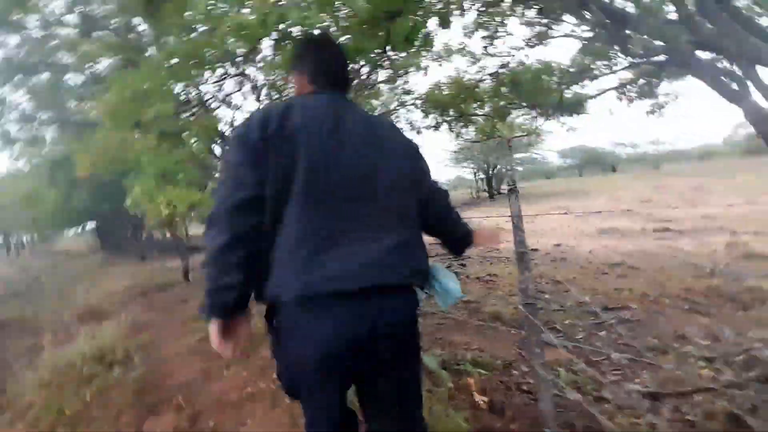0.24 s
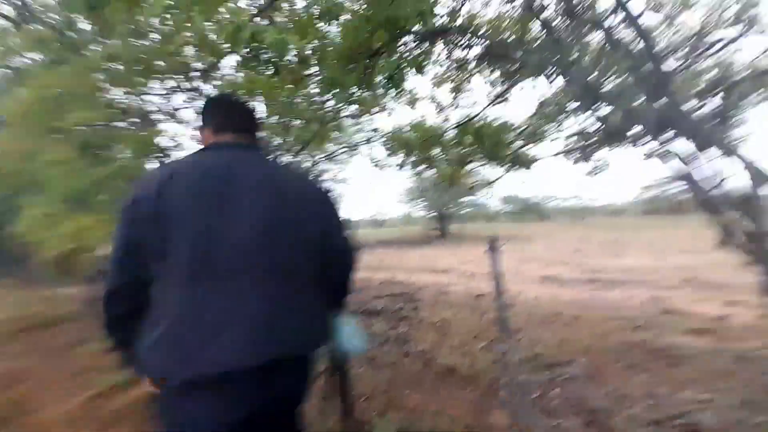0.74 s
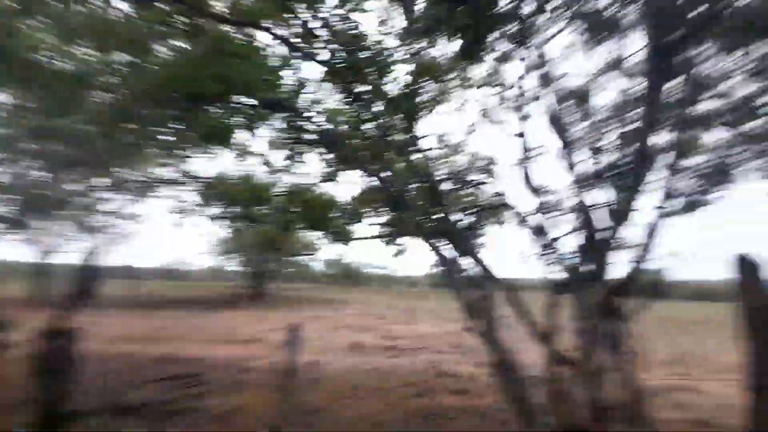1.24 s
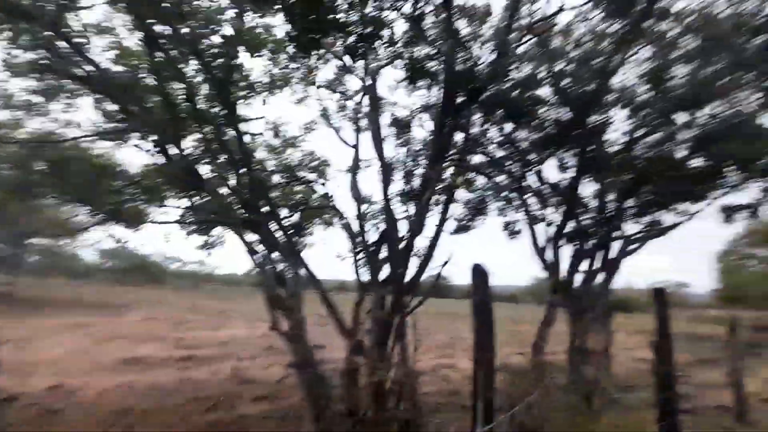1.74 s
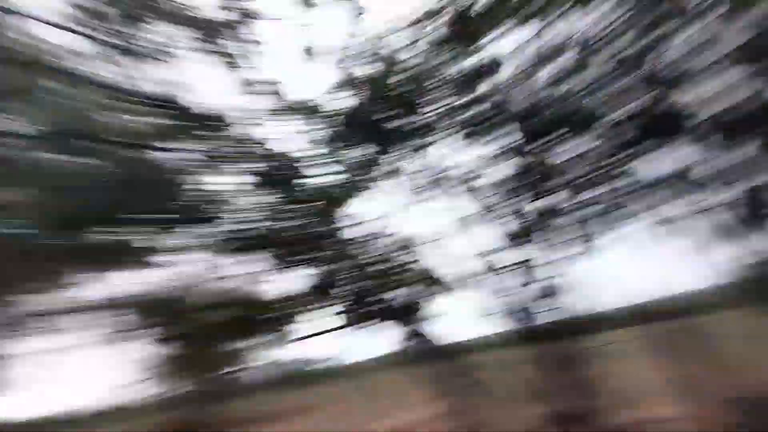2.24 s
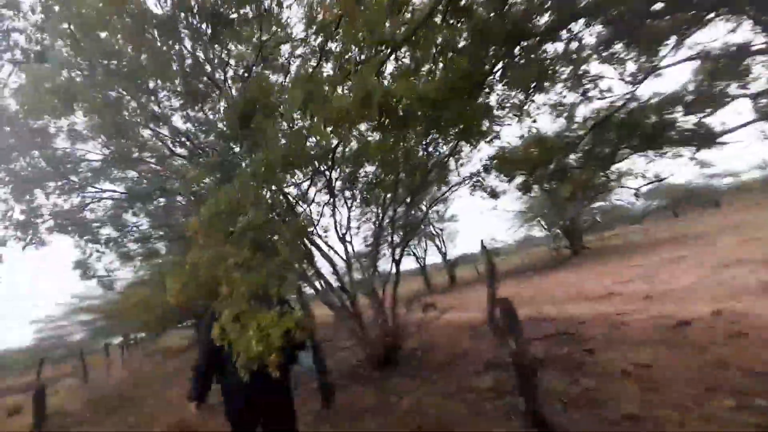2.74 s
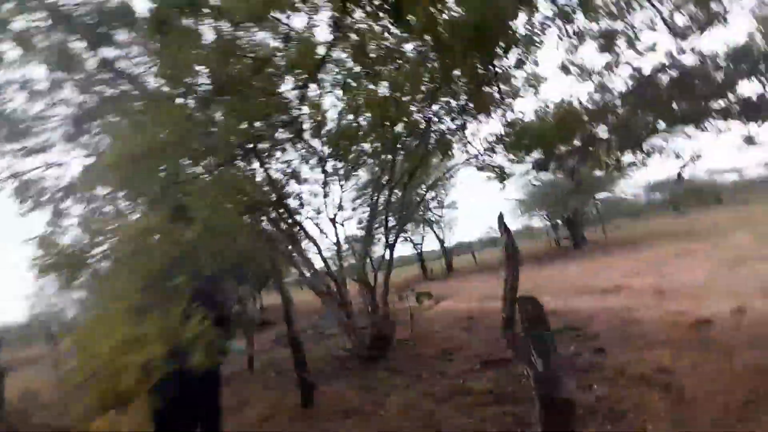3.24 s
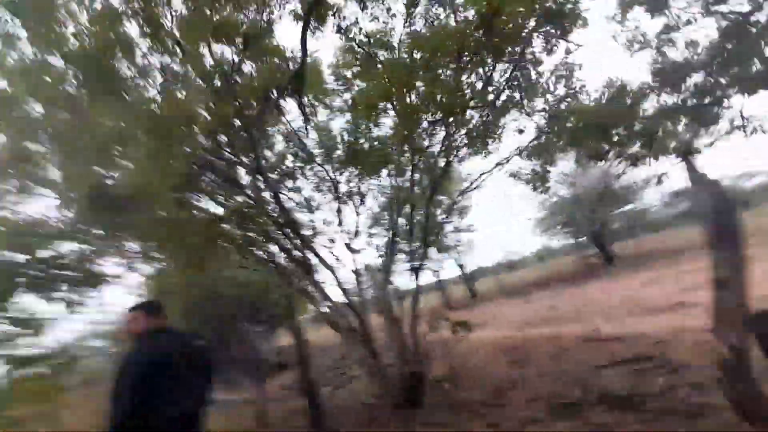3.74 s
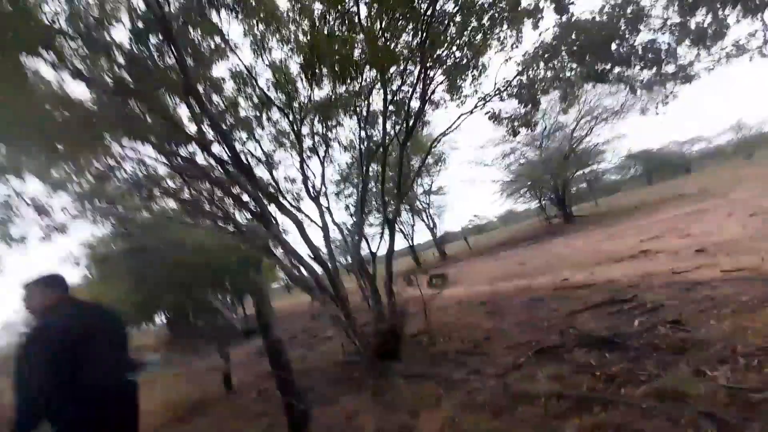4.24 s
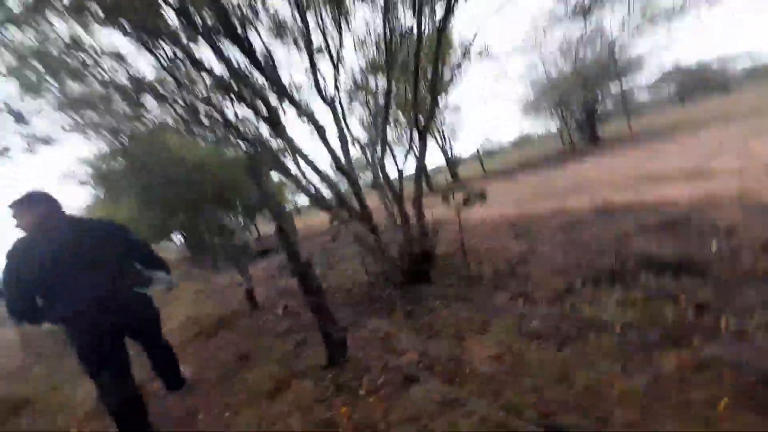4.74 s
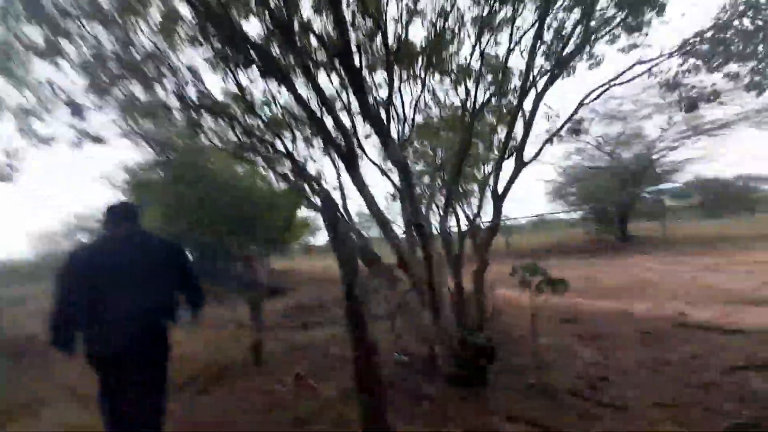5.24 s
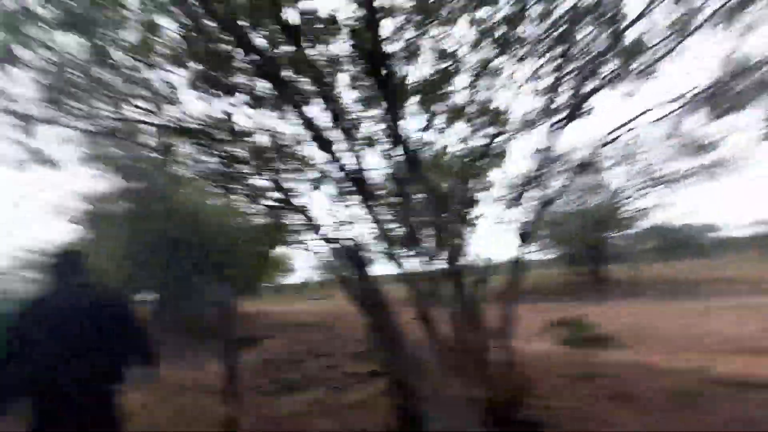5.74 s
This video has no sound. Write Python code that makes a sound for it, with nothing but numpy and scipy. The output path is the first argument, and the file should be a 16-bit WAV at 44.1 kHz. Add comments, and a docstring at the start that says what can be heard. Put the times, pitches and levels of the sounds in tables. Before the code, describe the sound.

Outdoors among trees beside an open field, two birds squeak continually for six seconds. Each call lasts under a fifth of a second: a rough rattling onset, a shrill nasal held tone rich in harmonics, then a quick downward slide. The two voices are close in pitch, the higher one slightly longer; they overlap near 0.1, 0.5, 0.9 and 1.3 s, drift into alternation from about 2 to 4 s, and coincide again near 4.4 and 4.9 s. The early calls are weaker; a strong one stands out at 1.3 s. Dull handling bumps and low rubbing hit the right side between 1.5 and 1.8 s, with two more thumps near 3 s. Grainy footsteps scuff softly, clearest around 0.6, 3.6, 4.2, 4.5 and 5.4 s, with small dry ticks and a sharp snap at 5.3 s. Very faint thin whistles pass at 2.7 and 5.3 s over low hiss and drone, with short diffuse echoes from the trees.

```python
"""A damp pasture with trees, where two birds trade shrill, arched squeaks that often overlap.
Each squeak is a harmonic stack with breath noise: it starts with a rattle, holds, and falls away.
Someone walks with a hand-held microphone: fingers bump the case with low pressure swings, and
hand, sleeves and steps rustle as bands of grainy noise. Twigs and drips tick as decaying noise,
and thin, very high whistles of narrow noise pass over a faint hiss and drone."""
import sys
import numpy as np
from scipy import signal
from scipy.fft import rfft, irfft
from scipy.io import wavfile

SR = 44100
rng = np.random.default_rng(int(sys.argv[2]) if len(sys.argv) > 2 else 0)


def to_wav(sig):
    """Store sig (one row per channel, or 1-D mono) as 16-bit WAV at the path in sys.argv[1].

    Samples outside -1..1 are clipped; the rate is SR.
    """
    pcm = np.clip(np.atleast_2d(sig), -1, 1) * 32767
    pcm = np.round(pcm).astype(np.int16)
    wavfile.write(sys.argv[1], SR, pcm.T)  # frames by channels


N = 264159  # length in samples

# Spectrum of the field hiss. Each row: frequency in Hz, relative level in dB per Hz.
HISS_SPECTRUM = [(24, -50), (40, -7.5), (96, 3), (243, -9), (529, -15), (852, -22), (1720, -12.5),
                 (2050, -10.5), (3060, -19.5), (3300, -22), (4240, -12.5), (5180, -21), (16000, -26)]
# Level of the field hiss before its flicker. Each row: time in seconds, level in dB.
HISS_LEVEL = [(0, -60.5), (.8, -62.5), (1.252, -68), (2.0, -63), (4.3, -65.5), (4.7, -64), (6, -65)]
# Narrow humps in the background. Each row: centre in Hz, width in Hz, level in dB.
HUMPS = [(79.5, 14.5, -65.5), (3244, 177, -69)]
# Thin, very high whistles. Each row: middle in seconds, half length in seconds, level in dB.
WHISTLES = [(2.744, 0.038, -59), (5.269, 0.03, -56)]
# Partials of a whistle. Each row: frequency in Hz, relative level in dB.
WHISTLE_LINES = [(11300, -3), (14100, 0), (15400, -4)]
# Twigs and drips. Each row: start in seconds, peak in dB, centre of the noise band in Hz.
TICKS = [(0.921, -39, 2200), (2.054, -37.5, 3770), (2.343, -37, 3000), (2.594, -38, 1600),
         (3.693, -39, 2500), (3.7865, -45, 2600), (5.279, -33.5, 10900), (5.402, -40, 13000),
         (5.557, -41.5, 4000)]

# The hand rubs the case. Each row: middle in seconds, half length in seconds, level in dB.
RUBS = [(1.013, 0.036, -53.5), (1.48, 0.055, -50.5), (1.77, .16, -50.5)]
# Sleeves brush past. Each row: middle in seconds, half length in seconds, level in dB.
SLEEVES = [(.32, 0.11, -63.5), (2.287, .12, -62.5), (3.145, .14, -69), (5.85, .14, -68.5)]
# Feet scuff through litter. Each row: middle in seconds, half length in seconds, level in dB.
STEPS = [(.35, 0.11, -62), (.629, 0.027, -55), (1.018, 0.076, -59), (2.55, .11, -61.5), (3.59, 0.037, -51),
         (3.682, 0.029, -53.5), (4.2, 0.027, -53.5), (4.506, .1, -54.5), (5.046, 0.11, -61),
         (5.382, .031, -52.5), (5.469, .006, -48.5), (5.848, 0.04, -56)]
# Sticks knock underfoot. Each row: middle in seconds, half length in seconds, level in dB.
KNOCKS = [(2.345, 0.0054, -49.5), (5.56, .013, -55.5)]
# Bumps on the case beside the right port. Each row: middle in seconds, peak in dB, pitch in Hz.
BUMPS = [(1.506, -27, 91.5), (1.52, -29.5, 135), (1.622, -28.5, 73), (1.6438, -23, 142), (1.7048, -20, 104),
         (1.787, -33, 79.4), (2.951, -31, 55), (2.988, -26.5, 107)]

# The case shades the two ports differently. Each row: frequency in Hz, left-right difference in dB.
SHADE = [(1200, -4.5), (2450, -9), (3700, -3.5), (5000, 0), (8000, 5), (12000, -7)]
# Partials near the second harmonic are lifted a little. The row: centre in Hz, width in Hz, lift in dB.
SECOND_LIFT = (2610, 425, 4.1)
# The birds shift between the ports as the microphone swings.
# Each row: time in seconds, left-right difference in dB.
BEARING = [(0, -1.5), (1.0, -1), (1.7, 1.5), (2.5, -0.5), (3.6, 0), (4.5, -2.5), (5.9, -1.5)]
# Fundamental of both birds, faint at first. Each row: time in seconds, level in dB.
FUNDAMENTAL = [(0, -70.5), (1.5, -68.5), (2.5, -62.5), (4.4, -60.5), (6, -64)]
# Squeaks of the lower, quicker bird. Each row: start in seconds, length in seconds, pitch in Hz,
# level of the second harmonic in dB, third harmonic in dB above that,
# upper harmonics in dB above the second, crescendo from start to end in dB.
LOW_SQUEAKS = [(.121, 0.16, 1246, -49.5, 5, -6.5, -0.5), (.506, 0.15, 1290, -53, 3.5, -1, 6),
               (.893, 0.17, 1266, -52.5, -1, -2, 2), (1.286, .166, 1252, -34.5, -10, -16, 0.5),
               (1.696, 0.15, 1276, -38.5, -2.5, -11, 1), (2.107, 0.17, 1253, -44, -3.5, -4, -0.5),
               (2.484, .152, 1264, -44, -1, -5, 1.5), (2.896, 0.16, 1242, -45, -7, -6, 1),
               (3.368, 0.17, 1253, -44, -10.5, -9, -5), (3.816, 0.15, 1210, -46.5, -7.5, -3, 1),
               (4.411, .14, 1214, -49.5, 3, 0, -0.5), (4.937, 0.16, 1246, -46, -0.5, -7, -9.5),
               (5.479, 0.15, 1238, -49, -6, -8.5, -8.5)]
# Squeaks of the higher, more drawn-out bird. Each row: start in seconds, length in seconds,
# pitch in Hz, level of the second harmonic in dB, third harmonic in dB above that,
# upper harmonics in dB above the second, crescendo from start to end in dB.
HIGH_SQUEAKS = [(.066, .212, 1295, -54.5, -2.5, -6, 5), (.473, .18, 1323, -58, 0, -6, -1),
                (.894, .165, 1293, -51, 1.5, -2, 1.5), (1.329, 0.21, 1278, -54.5, 4, 0, -1.5),
                (1.783, 0.18, 1314, -48, 6, -0.5, 2.5), (2.214, 0.19, 1326, -47.5, 3, -4, 1.5),
                (2.645, 0.18, 1307, -52, 2, -2.5, -11.5), (3.083, 0.19, 1283, -45.5, 0.5, -14, -3.5),
                (3.514, 0.19, 1303, -48, 2.5, -6, -4.5), (3.948, 0.19, 1309, -52.5, -2.5, -1.5, -8),
                (4.398, 0.18, 1311, -45.5, -0.5, -10.5, -3.5), (4.836, 0.19, 1277, -47.5, 0, -9.5, -9),
                (5.287, 0.18, 1318, -47, -8, -6, -3.5), (5.732, 0.19, 1292, -47.5, -8, -5, -6)]
# Voice of the lower bird. The entries: initial pitch deficit as a fraction, rise time in seconds,
# final pitch drop as a fraction, power of the drop, initial level deficit in dB, swell time in
# seconds, fraction of the length held, release in dB, throat (centre in Hz, width in Hz, lift in dB).
LOW_VOICE = dict(spring=0.14, rise_s=.011, drop=.28, drop_curve=3.7, swell_db=12.5, swell_s=0.015, hold=0.58, release_db=15.5, throat=(4520, 450, 5.2))
# Voice of the higher bird, with the same entries and units.
HIGH_VOICE = dict(spring=.13, rise_s=.02, drop=.3, drop_curve=4.4, swell_db=11, swell_s=0.019, hold=0.7, release_db=19.5, throat=(3300, 640, 2.3))
# Harmonics 4 to 12 of the lower bird. Each entry: level in dB against the upper level.
LOW_HARMONICS = [1, -4, -11, -16.5, -23, -12.5, -15.5, -17, -23]
# Harmonics 4 to 12 of the higher bird. Each entry: level in dB against the upper level.
HIGH_HARMONICS = [-2, -2, -9.5, -17.5, -23.5, -12.5, -12, -15.5, -25]

RATTLE_S, RATTLE_DEPTH = 0.05, 0.66  # decay time in seconds; depth as a fraction
RATTLE_JITTER, JITTER = 0.0173, 0.0066  # pitch shake in the rattle and throughout, as fractions
RASP_DB, RASP_IN_RATTLE = -24, 5  # dB before the third harmonic's share; extra gain in the rattle
HISS_DB = -16  # breath hiss in dB against the upper harmonics
FLUTTER_DB = 0.99  # flutter in dB, before its scaling by harmonic number
CRACKLE, CRACKLE_HZ = 0.3, 1101  # uneven cycles at either end of a squeak: depth, rate in Hz
FADE_DB = 2.5  # final loss in dB per harmonic above the fourth, up to the eighth
CUTOFF_HZ = 15900


def from_db(db):
    """A level in decibels is twenty times the base-ten logarithm of the gain."""
    return 10 ** (np.asarray(db) / 20)


def rms_one(x):
    """Division by the root mean square gives unit effective amplitude."""
    return x / np.sqrt(np.mean(x ** 2) + 1e-20)


def at_hz(points, hz):
    """Interpolation of a spectrum is linear in dB along a log-frequency axis."""
    centres, levels = np.transpose(points)
    return np.interp(np.log(hz), np.log(centres), levels)


def lift_db(hz, centre, width, top_db):
    """Resonance lifts a partial according to its distance from the centre."""
    return top_db / (1 + (2 * (hz - centre) / width) ** 2)


def panned(pan_db):
    """A level difference, split evenly between left and right, sets the stereo position."""
    return from_db(np.array([[.5], [-.5]]) * pan_db)


def band(x, hz, octaves, order=2):
    """Band-pass filtering keeps equal parts of an octave span on each side of the centre."""
    low = hz / 2 ** (octaves / 2)
    high = min(hz * 2 ** (octaves / 2), SR * .48)
    return signal.sosfilt(signal.butter(order, [low, high], "band", fs=SR, output="sos"), x)


def wobble(rate_hz, size):
    """Random fluctuation: normal values at a given rate, joined by straight lines."""
    return np.interp(np.arange(size) * rate_hz / SR, np.arange(size), rng.standard_normal(size))


def stereo_noise(size, alike=0.42):
    """Partial coherence: white noise with a given share of its power common to both ports."""
    shared = np.clip(alike, 0, 1)
    common = np.sqrt(shared) * rng.standard_normal(size)
    return common + np.sqrt(1 - shared) * rng.standard_normal((2, size))


def add(out, s, sound):
    """Superposition: a sound is summed in at its time in seconds."""
    start = max(round(s * SR), 0)
    out[:, start:start + sound.shape[-1]] += sound[..., :max(N - start, 0)]


def field(patchy_db=5.0, lean_db=-1):
    """Spectral shaping of noise: faint, flickering hiss of wet leaves over a far drone."""
    hz = np.maximum(np.arange(N // 2 + 1) * SR / N, 1)
    hiss = rms_one(irfft(rfft(stereo_noise(N)) * from_db(at_hz(HISS_SPECTRUM, hz)), N))
    level_db = np.interp(np.arange(N) / SR, *np.transpose(HISS_LEVEL))
    out = hiss * from_db(level_db + patchy_db * wobble(25, N))
    for centre, width, hump_db in HUMPS:
        hump = signal.lfilter(*signal.iirpeak(centre, centre / width, fs=SR), stereo_noise(N))
        out = out + from_db(hump_db) * rms_one(hump)
    return out * panned(lean_db)


def whistles(octaves=0.017):
    """Narrow-band noise approaches a tone: brief, thin whistles far above the squeaks."""
    out = np.zeros((2, N))
    for s, half, level_db in WHISTLES:
        t = np.arange(-2 * half, 2 * half, 1 / SR)
        lines = np.zeros((2, len(t)))
        for hz, line_db in WHISTLE_LINES:
            lines += from_db(line_db) * band(stereo_noise(len(t)), hz, octaves, order=1)
        envelope = np.exp(-(t / half) ** 2)
        add(out, s + t[0], from_db(level_db) * rms_one(lines) * envelope)
    return out


def ticks(octaves=2.3):
    """Rapid exponential decay makes a noise burst a tiny dry snap."""
    out, t = np.zeros((2, N)), np.arange(SR // 20) / SR
    dying = np.exp(-t / .0009)
    for s, peak_db, hz in TICKS:
        snap = band(stereo_noise(len(t)) * dying, hz, octaves)
        add(out, s, from_db(peak_db) * snap / np.abs(snap).max())
    return out


def rustles(strokes, hz, octaves, pan_db, grain_db):
    """Friction comes in uneven grains under the envelope of each stroke."""
    out = np.zeros((2, N))
    for s, half, level_db in strokes:
        t = np.arange(-2 * half, 2 * half, 1 / SR)
        grains = stereo_noise(len(t)) * from_db(grain_db * wobble(600, len(t)))
        stroke = rms_one(band(grains, hz, octaves)) * np.exp(-(t / half) ** 2)
        add(out, s + t[0], from_db(level_db) * panned(pan_db) * stroke)
    return out


def bumps(cycles=0.48, far_port_db=-27):
    """Near-field pressure: a finger beside one port pushes the air in a dull, short swing."""
    out, t = np.zeros((2, N)), np.arange(-SR // 20, SR // 20) / SR
    ports = from_db([[far_port_db], [0]])
    for s, peak_db, hz in BUMPS:
        envelope = np.exp(1 - np.sqrt(1 + (2 * t * hz / cycles) ** 2))
        swing = -np.cos(2 * np.pi * hz * t) * envelope
        add(out, s + t[0], from_db(peak_db) * ports * swing)
    return out


def walker():
    """Friction and impact of hand, sleeves and feet each occupy a register of their own."""
    hand = rustles(RUBS, hz=66.5, octaves=1.26, pan_db=-15, grain_db=4.0)
    sleeves = rustles(SLEEVES, hz=183, octaves=1.16, pan_db=-7.5, grain_db=4.0)
    feet = rustles(STEPS, hz=1257, octaves=2.14, pan_db=-1.5, grain_db=4)
    sticks = rustles(KNOCKS, hz=436, octaves=2.05, pan_db=-11, grain_db=1)
    return hand + sleeves + feet + sticks + bumps()


def echoes(x, t60, echo_db):
    """Diffuse scattering: dense echoes, unrelated at the two ports, fall 60 dB in t60 seconds."""
    t = np.arange(SR) / SR
    scatter = band(rng.standard_normal((2, SR)), 4000, 3, order=1)
    scatter = scatter * from_db(-60 * t / t60) * (1 - np.exp(-t / .004))
    scatter = scatter / np.sqrt(np.sum(scatter ** 2) / 2)
    return from_db(echo_db) * signal.fftconvolve(x, scatter, axes=1)[:, :N]


def squeak(length, hz, level_db, third_db, upper_db, crescendo_db, pan_db, fundamental_db,
           voice, harmonics):
    """Voiced sound is a harmonic stack: this one rattles at first, clears, then slides down."""
    t = np.arange(int(length * SR)) / SR
    u, size = t / length, len(t)
    # the membranes first beat in uneven bursts that quicken, then they settle
    rattle = np.exp(-(t / RATTLE_S) ** 2)
    beat_hz = (68 + 650 * t) * (1 + .15 * wobble(100, size))
    beat = 2 * np.pi * np.cumsum(beat_hz) / SR
    gate = 1 - (RATTLE_DEPTH * rattle ** 2 + .1) * (.5 - .5 * np.cos(beat - 1)) ** 3
    # the pitch springs up and drops at the end; it shakes with the bursts
    spring = voice["spring"] * np.exp(-t / voice["rise_s"])
    pitch = hz * (1 - spring - voice["drop"] * u ** voice["drop_curve"])
    shake = RATTLE_JITTER * rattle * np.sin(beat - 2)
    jitter = (JITTER + RATTLE_JITTER * rattle) * wobble(900, size)
    pitch = pitch * (1 + shake + jitter)
    phase = 2 * np.pi * np.cumsum(pitch) / SR
    # the level swells in, follows the crescendo and releases after the hold
    swell_db = -voice["swell_db"] * np.exp(-t / voice["swell_s"])
    release = np.maximum((u - voice["hold"]) / (1 - voice["hold"]), 0) ** 2
    release_db = -voice["release_db"] * release
    loudness = gate * from_db(level_db + crescendo_db * (u - .5) + swell_db + release_db)
    loudness = loudness * np.clip(np.minimum(t, length - t) / .002, 0, 1)
    # the throat all but hides the fundamental
    levels = [fundamental_db - level_db, 0, third_db, *(upper_db + np.array(harmonics))]
    out = np.zeros((2, size))
    for k, harmonic_db in enumerate(levels, 1):
        ports = rms_one(panned(pan_db + at_hz(SHADE, k * hz)))
        # the higher harmonics flutter most; those above the fourth fade near the end
        flutter_db = FLUTTER_DB * min(k - .8, 3.5) * wobble(70, size)
        fade_db = -FADE_DB * np.clip(k - 4, 0, 4) * u ** 6
        # the wave reaches the two ports out of step (radians)
        lag = np.array([[0], [1]]) * (1.4 + .04 * k + .38 * rng.standard_normal())
        resonance_db = lift_db(k * pitch, *SECOND_LIFT) + lift_db(k * pitch, *voice["throat"])
        gain = from_db(harmonic_db + flutter_db + fade_db + resonance_db)
        out += gain * ports * np.sqrt(2) * np.sin(k * phase + lag)
    # the cycles turn uneven while the voice catches and as it gives out
    out = out * (1 + CRACKLE * (rattle + u ** 4) * wobble(CRACKLE_HZ, size))
    # air rushes through with the tone, its rasp strongest in the rattle
    air = stereo_noise(size)
    rasp = from_db(RASP_DB + 0.75 * third_db) * rms_one(band(air, 2730, 0.82, order=4))
    rasp = rasp * (1 + RASP_IN_RATTLE * rattle)
    hiss = from_db(HISS_DB + upper_db) * rms_one(band(air, 12400, 0.56))
    return (out + rasp + hiss) * loudness


def bird(squeaks, voice, harmonics):
    """One vocal tract, with fixed resonance and harmonic balance, shapes a bird's every squeak."""
    out = np.zeros((2, N))
    for s, *call in squeaks:
        pan_db = np.interp(s, *np.transpose(BEARING))
        fundamental_db = np.interp(s, *np.transpose(FUNDAMENTAL))
        add(out, s, squeak(*call, pan_db, fundamental_db, voice, harmonics))
    return out


def scene():
    """Superposition of the field all round, the walker close by and the birds in the trees."""
    background = field() + whistles() + ticks()
    low_bird = bird(LOW_SQUEAKS, LOW_VOICE, LOW_HARMONICS)
    high_bird = bird(HIGH_SQUEAKS, HIGH_VOICE, HIGH_HARMONICS)
    calls = low_bird + high_bird
    early_echo = echoes(calls, t60=0.058, echo_db=-13)
    grove = echoes(calls, t60=0.37, echo_db=-14.5)
    return background + walker() + calls + early_echo + grove


def record(dry):
    """Band limiting: the deepest bass is thinned and the top is cut steeply."""
    dry = signal.sosfilt(signal.butter(2, 30, "high", fs=SR, output="sos"), dry)
    return signal.sosfilt(signal.ellip(10, .2, 70, CUTOFF_HZ, fs=SR, output="sos"), dry)


dry = scene()
out = record(dry)
to_wav(out)
```